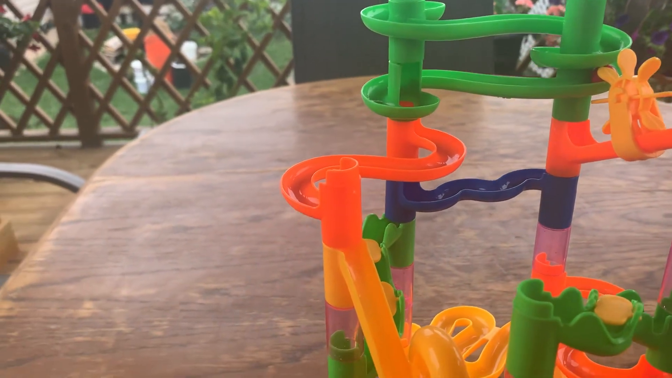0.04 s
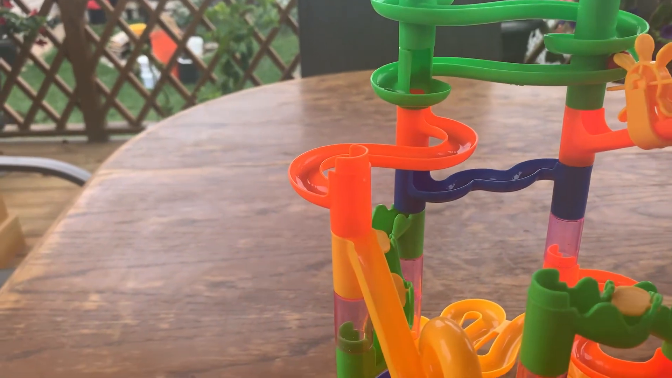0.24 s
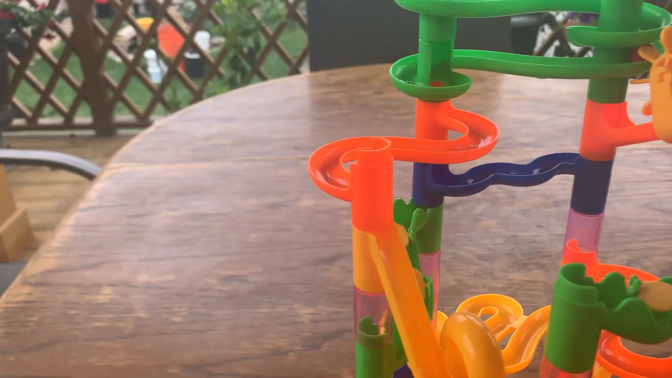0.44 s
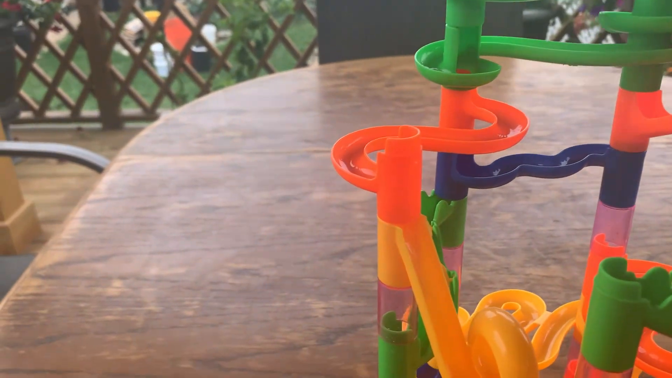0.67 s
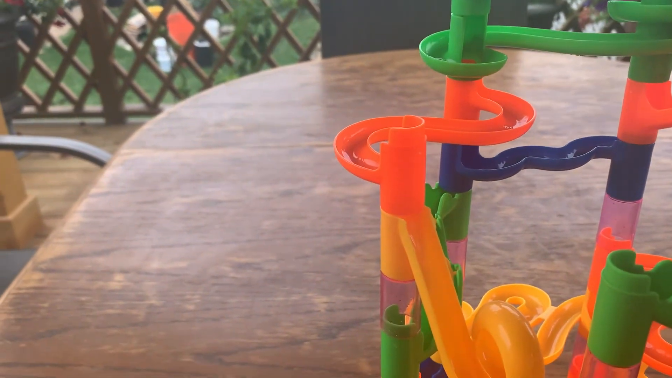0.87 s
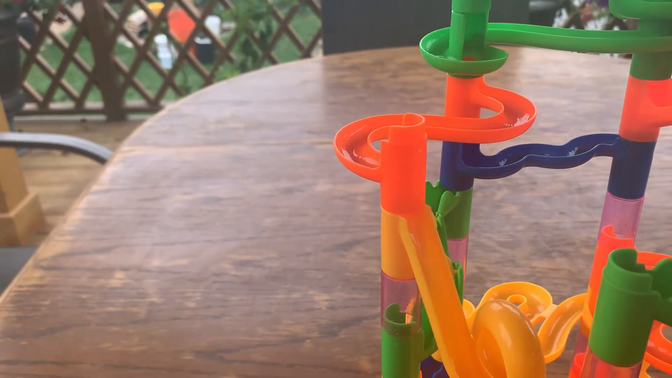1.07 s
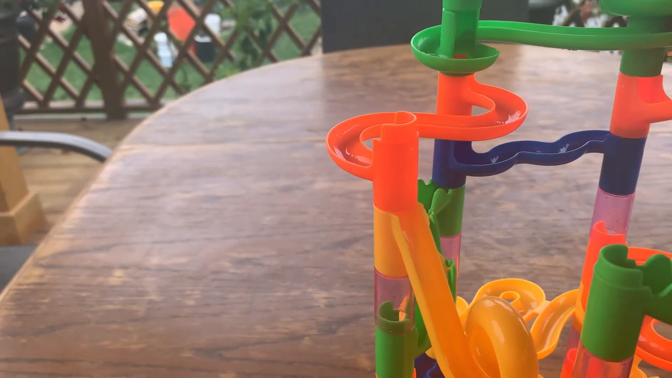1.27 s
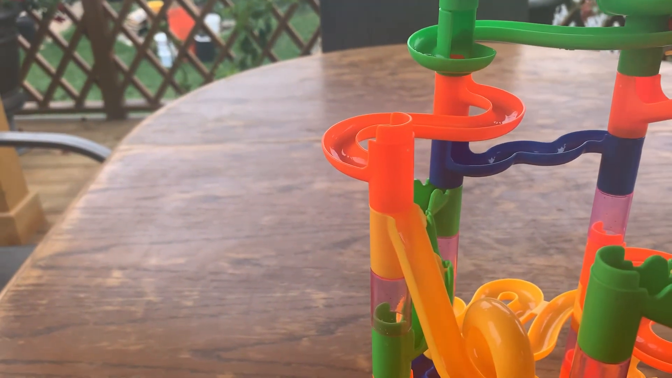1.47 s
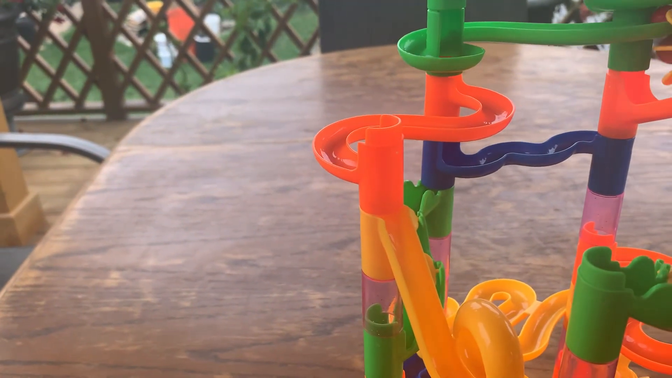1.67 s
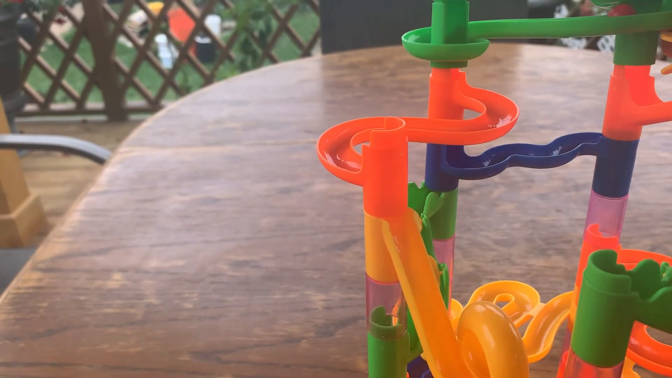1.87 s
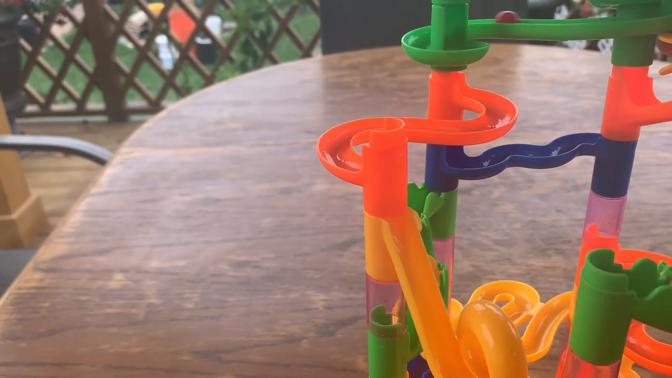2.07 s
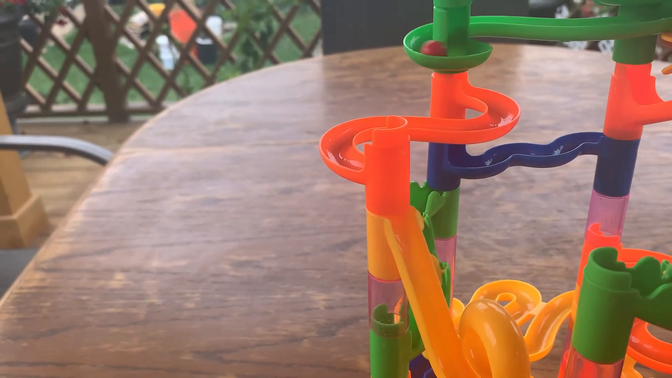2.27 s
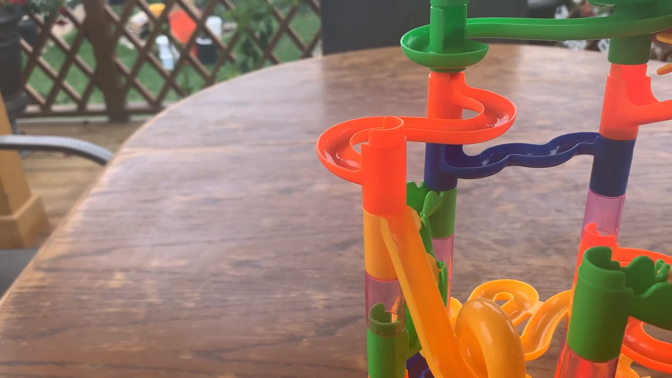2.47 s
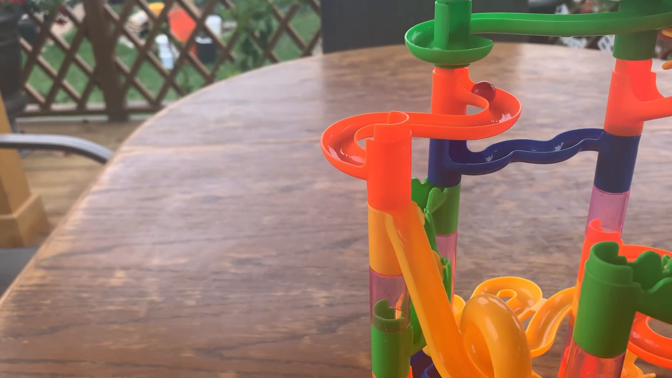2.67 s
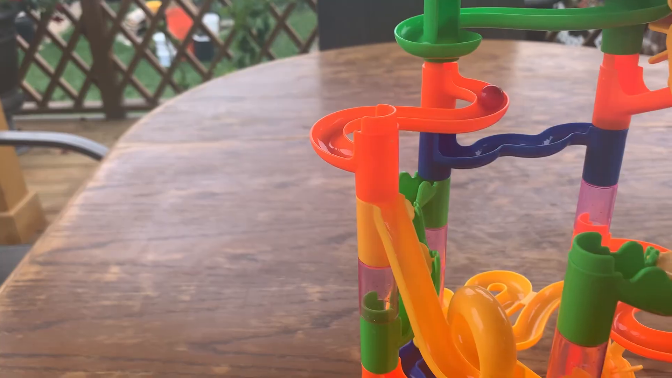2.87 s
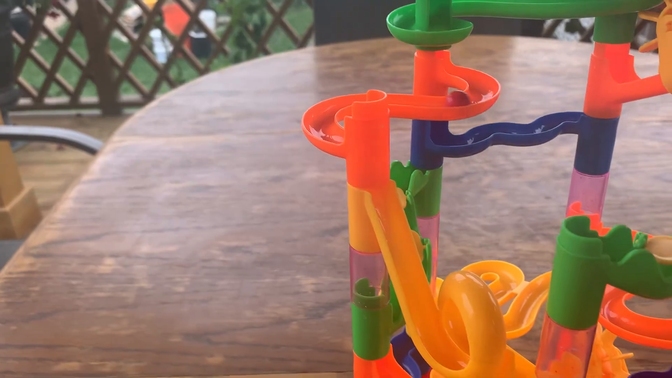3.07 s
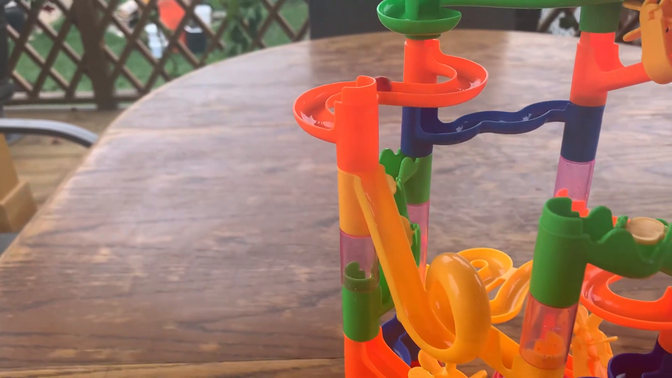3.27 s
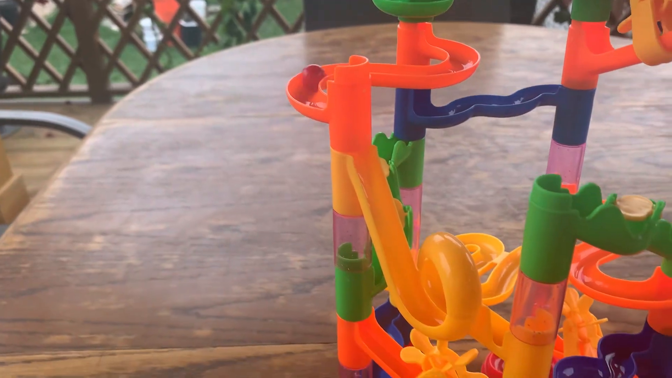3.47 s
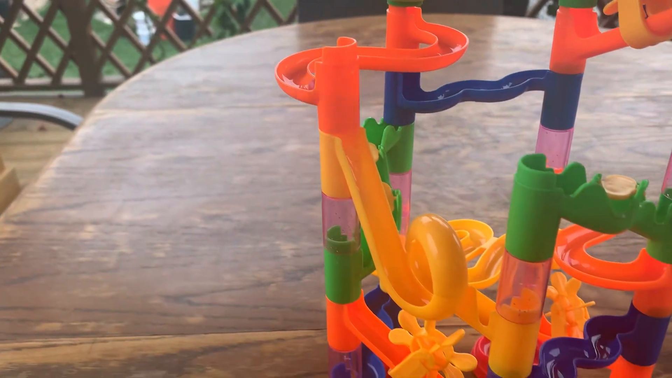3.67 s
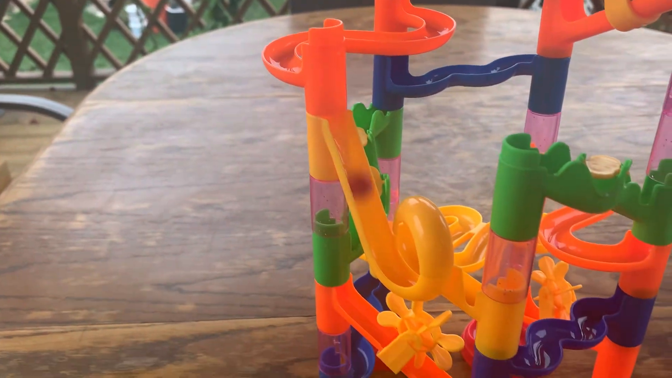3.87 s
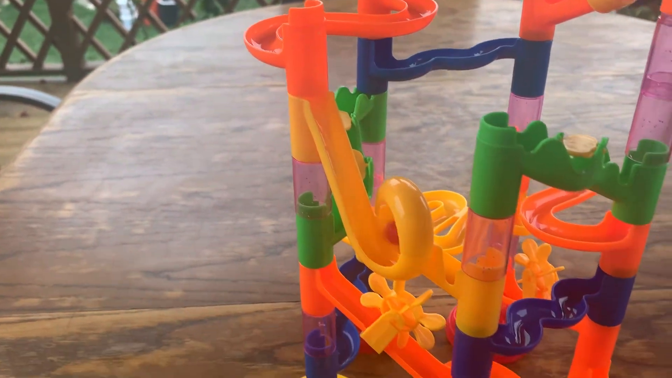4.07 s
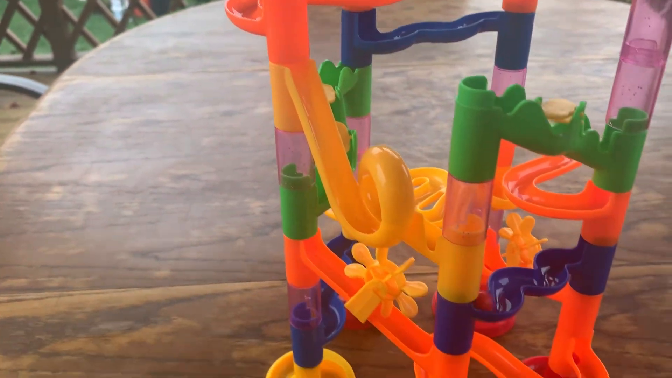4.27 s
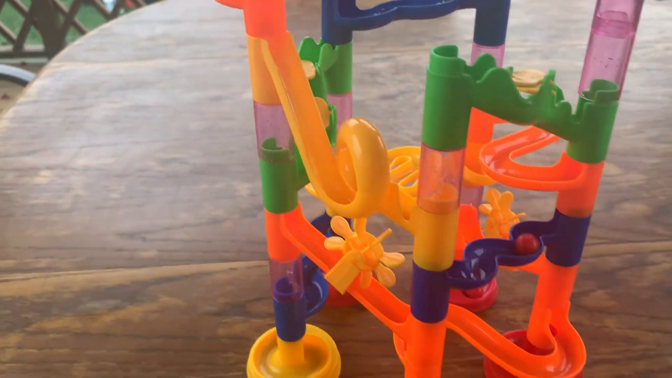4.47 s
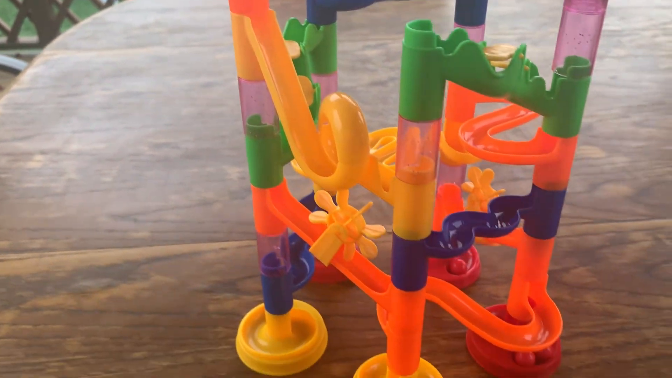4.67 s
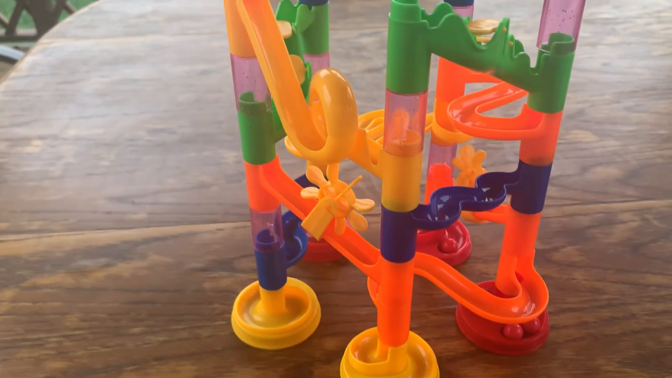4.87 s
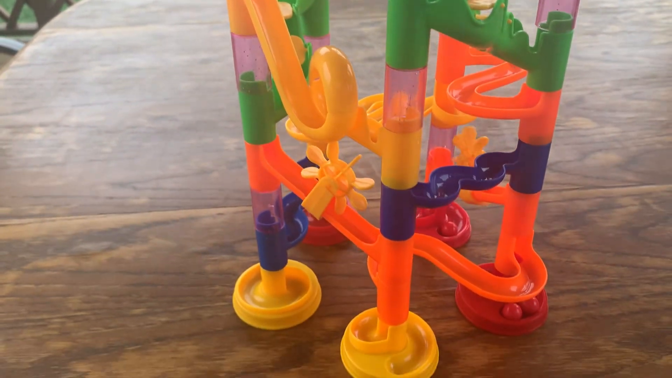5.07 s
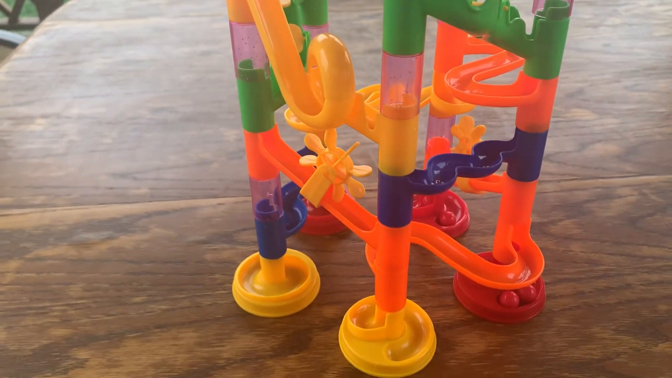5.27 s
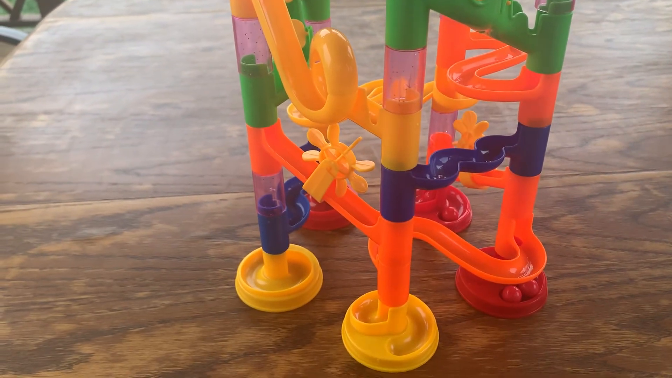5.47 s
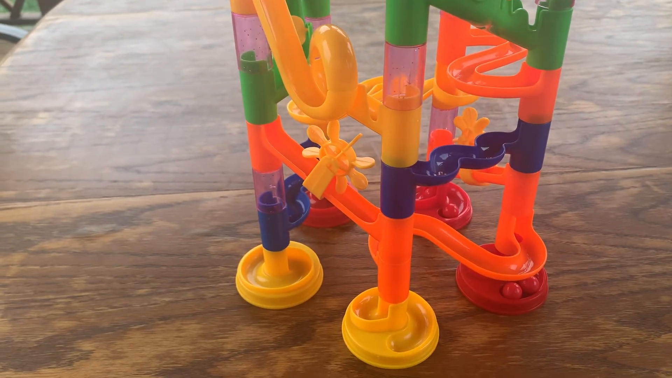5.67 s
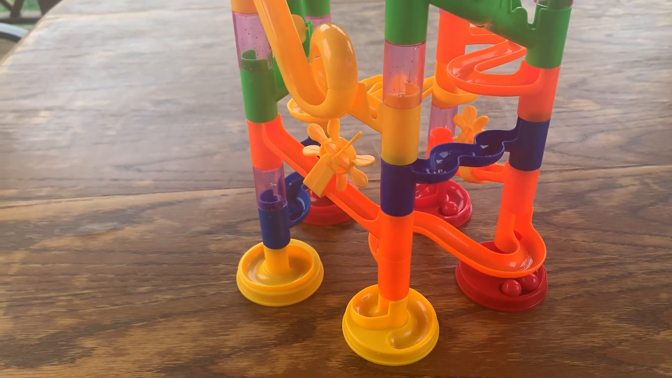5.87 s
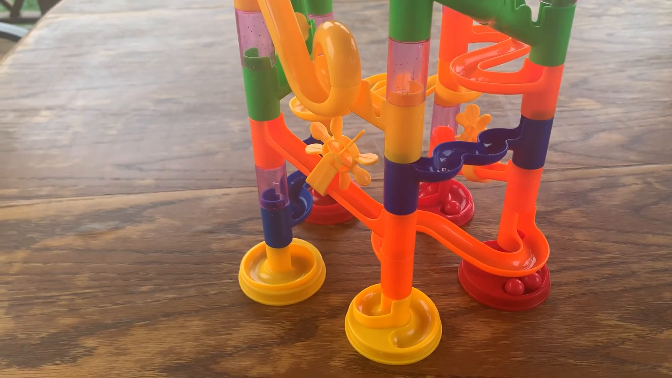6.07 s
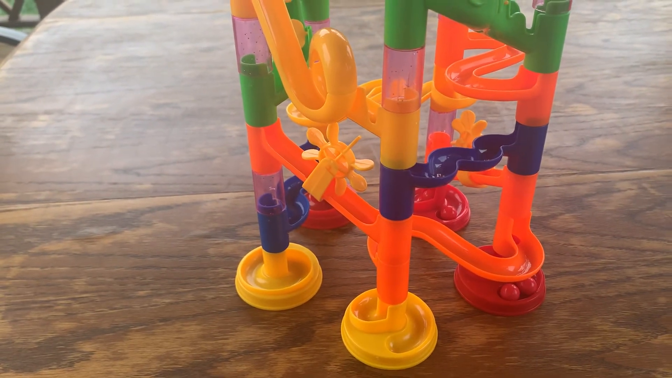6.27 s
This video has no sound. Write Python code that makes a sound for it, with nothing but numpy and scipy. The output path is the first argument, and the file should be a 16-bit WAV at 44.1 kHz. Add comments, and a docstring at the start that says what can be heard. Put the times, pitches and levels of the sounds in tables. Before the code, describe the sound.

Close stereo sound of a marble run on a sheltered deck. The marble ticks lightly in a tube, rolls dully and gets grittier, then drops with a few sharp plastic cracks. It purrs quietly round a bend with a tiny squeaky whirr, then rattles fast and loud through several pieces, thudding lightly in the wooden table. Last knocks in the cup end abruptly, leaving soft outdoor rumble and hiss.

```python
"""On a sheltered outdoor deck, a glass marble runs down a plastic marble tower on a wooden table.
It knocks about in the top tube, rolls along open tracks, drops from piece to piece and lands in the base cup.
Knocks and rolling are shaped noise and tiny ticks, sent through the resonances of each plastic piece.
Knocks also thud in the table, the more so the harder they are, and nearby surfaces answer with a short echo.
Distant rumble and a faint, slowly fading hiss lie beneath."""
import sys
import numpy as np
from scipy import signal
from scipy.fft import rfft, irfft, next_fast_len
from scipy.io import wavfile
from scipy.ndimage import map_coordinates

SR = 44100
rng = np.random.default_rng(int(sys.argv[2]) if len(sys.argv) > 2 else 0)


def dump(signal):
    """Clip the signal to [-1, 1] and save it as 16-bit WAV at the path in sys.argv[1]."""
    limited = np.clip(np.atleast_2d(signal).T, -1, 1)
    pcm = np.round(limited * 32767).astype(np.int16)
    wavfile.write(sys.argv[1], SR, pcm)


N = 279141

# The marble's knocks against the plastic. Each row: start in seconds, level in dB before the gains of
# knock() and thuds(), hollow low part in dB relative to that level.
CLICKS = [(0.6235, -36, -7.5), (0.6362, -37, -2.5), (0.745, -39.5, -1.5), (0.7732, -44.5, 4.5),
          (0.89, -46.5, 2), (0.9819, -52, 9.5), (1.2009, -48, 9), (1.2393, -63, 15), (1.2978, -68.5, 19.5),
          (1.779, -66, -5), (1.814, -67.5, 16.5), (1.9287, -53.5, -0.5), (1.9971, -57.5, 5.5),
          (2.067, -53.5, 1.5), (2.1168, -52, 1), (2.166, -50.5, 4), (2.2235, -49, 3.5), (2.248, -45, -9.5),
          (2.277, -37.5, -1), (2.3078, -36, -4), (2.34, -48.5, 8), (2.4545, -31, -3.5), (2.4905, -18, -9),
          (2.5313, -25.5, -8), (2.843, -71.5, 20.5), (3.063, -66.5, 7.5), (3.105, -64.5, 6),
          (3.2098, -59.5, -5), (3.445, -48.5, 6), (3.5571, -54.5, 4), (3.5956, -49.5, 4), (3.6782, -49, 5),
          (3.7198, -35, -11.5), (3.7248, -26, -4.5), (3.742, -20.5, -3.5), (3.7967, -30.5, -4),
          (3.881, -43.5, 10), (3.9084, -31, -6.5), (3.9204, -31.5, -0.5), (3.945, -30, 0.5),
          (3.9734, -38.5, -13.5), (4.0689, -18.5, -13.5), (4.0788, -26, -16), (4.0818, -18.5, -1.5),
          (4.1595, -30, -22), (4.1932, -20.5, -7), (4.2114, -25.5, -1.5), (4.228, -25.5, -17.5),
          (4.248, -24.5, -8), (4.2645, -22, -5), (4.3726, -51.5, 9), (4.455, -45.5, -6),
          (4.4862, -41.5, -8), (4.5052, -29.5, -5.5), (4.5475, -45, 2), (4.6262, -20, -12),
          (4.644, -25.5, -4), (4.6566, -29, -12), (4.667, -15.5, -9), (4.6999, -24, -6), (4.7482, -33, 1),
          (4.7817, -28, -24), (4.7976, -31.5, -7.5), (4.8184, -38, 1.5), (4.887, -44.5, -0.5),
          (4.9483, -38, -1), (4.986, -22.5, -3), (5.0033, -33, -4.5), (5.0233, -25, -17),
          (5.032, -14, -13.5), (5.081, -28.5, -7.5), (5.1115, -32, -5), (5.299, -55, -7.5)]
# Resonances of each plastic piece. Each row: pitch in Hz, height in dB above the shell's dense ring.
TOP_TUBE = [(1270, 7.5), (1615, 6.5), (2175, 4), (3402, 5), (6643, 7)]
UPPER_TRACK = [(1830, 5.9), (2821, 4), (3327, 3.3), (4436, 9), (9475, 5.8)]
DROP_TUBE = [(2196, 5), (3198, 5), (4360, 7.7), (6611, 11), (9345, 14), (9798, 9)]
S_TRACK = [(1292, 6.4), (1658, 4.9), (2832, 11), (3058, 5.2), (4436, 5.9), (8538, 4.1)]
CHUTE = [(1378, 4.5), (1637, 5.5), (2950, 13), (4317, 9.8), (6019, 10), (7214, 9.2)]
LOOP = [(1217, 7.8), (2885, 11), (3359, 17), (6126, 6), (6632, 13), (6869, 8), (11122, 8.9)]
LOOP_EXIT = [(2918, 4.73), (3338, 10), (4070, 4.7), (5426, 9.8), (6772, 8), (8753, 8)]
WAVY_TRACK = [(1701, 11.2), (1927, 7.5), (6621, 4.5), (7063, 5.4), (7720, 7), (8807, 5.8)]
BASE_CUP = [(1421, 12), (1820, 9.6), (6288, 4.3), (6901, 11), (8398, 3), (9453, 3.5), (10142, 17)]
# The marble's way down. Each row: arrival in seconds, resonances of the piece, extra echo in dB,
# treble of a hard knock in dB, thud of a hard knock in dB before the gains of thuds().
ROUTE = [(0.5, TOP_TUBE, 3.5, -2.5, -35), (1.452, UPPER_TRACK, 2, -4, -55), (2.43, DROP_TUBE, 0.5, -6, -44),
         (2.7, S_TRACK, .5, -8, -53), (3.705, CHUTE, 2.5, -3, -44), (4.045, LOOP, -.5, -6, -52.5),
         (4.14, LOOP_EXIT, -2, -5, -45), (4.42, WAVY_TRACK, -3, -7.5, -43.5),
         (4.97, BASE_CUP, -1, -7.5, -44)]
HARD_DB = -25  # level in the click table that counts as a hard knock


def amp(db):
    """Turn decibels into a gain."""
    return 10 ** (np.asarray(db) / 20)


def unit(x):
    """Scale a sound to an rms level of 1."""
    return x / np.sqrt(np.mean(x ** 2) + 1e-20)


def along(points, hz):
    """Read a curve of (Hz, value) points at any frequency, on a logarithmic frequency axis."""
    f, v = np.transpose(points)
    return np.interp(np.log(hz + 1), np.log(f + 1), v)


def filtered(x, response):
    """Filter a sound by multiplying its spectrum by a function of frequency."""
    n = x.shape[-1]
    m = next_fast_len(n + min(n, SR // 4))
    return irfft(rfft(x, m) * response(np.fft.rfftfreq(m, 1 / SR)), m)[..., :n]


def fade(t, t60):
    """Die away exponentially, by 60 dB in t60 seconds."""
    return np.exp(-np.log(1000) * t / t60)


def add(track, s, sound):
    """Mix a sound into a track, starting at s seconds."""
    part = track[round(s * SR):][:len(sound)]
    part += sound[:len(part)]


def wobble(count, spacing):
    """A smooth random curve of count values, with a new random knot every spacing values."""
    knots = rng.standard_normal(int(count / spacing) + 4)
    return map_coordinates(knots, [np.arange(count) / spacing])


def place(s):
    """The row of the route that the marble has reached at s seconds."""
    return ROUTE[sum(row[0] <= s for row in ROUTE[1:])]


def marble(own_share=.55, scatter_db=-3):
    """Knocks, rolling and hops ring whichever piece the marble is in; the whirr joins them directly."""
    contacts = clicks() + rolling() + hops()
    direct, aside, echo = whirr(), np.zeros(N), np.zeros((2, N))
    edges = [round(row[0] * SR) for row in ROUTE] + [N]
    for (s, modes, echo_db, *_), a, b in zip(ROUTE, edges, edges[1:]):
        # half a second of silence lets the piece ring on
        shell = np.pad(contacts[a:b], (0, SR // 2))[:N - a]
        sound = piece(shell, modes)
        add(direct, s, sound)
        add(aside, s, amp(scatter_db) * scattered(sound))
        # the whole tower radiates towards the walls, so one piece colours the echo less
        radiated = (shell + own_share * (sound - shell)) * amp(echo_db)
        for track, answer in zip(echo, deck(radiated)):
            add(track, s, answer)
    return ports(direct + echo[0], aside + echo[1])


def clicks(rebound_s=.013, rebound_db=-15):
    """The marble drops and knocks against the walls; after a short flight it touches once more, softer."""
    out = np.zeros(N)
    for (s, db, body_db), luck in zip(CLICKS, rng.random(len(CLICKS))):
        add(out, s, knock(s, db, body_db))
        flight = rebound_s * (.5 + luck)  # rebound_s is the mean
        add(out, s + flight, knock(s, db + rebound_db, body_db))
    return out


def knock(s, db, body_db, level_db=7, ring_t60=0.043, crack_t60=0.018, crack_db=3.5, crack_hz=5000,
          attack=0.0009, spot_db=3.0, treble_per_db=0.2449):
    """One contact sets the dense modes of a thin plastic shell ringing; the highest die first."""
    # The shell's dense ring. Each row: frequency in Hz, level in dB per Hz.
    shell_ring = [(60, -38.5), (250, -11), (520, -14), (800, -6.5), (1200, 2.5), (1900, 5), (3000, 2),
                  (7000, -0.5), (10000, 4), (12000, 3.5), (13500, -4), (15500, -2)]
    t = np.arange(SR // 16) / SR
    # the harder the knock, the shorter the contact and the brighter its sound
    *_, hard_treble_db, _ = place(s)
    treble_db = hard_treble_db + treble_per_db * (db - HARD_DB)
    contact = [(2000, body_db), (3000, 0), (7000, 0), (9500, treble_db)]  # Hz, dB
    # every spot on the shell favours other modes
    spot = lambda hz: spot_db * wobble(len(hz), 20)
    colour = lambda hz: amp(along(shell_ring, hz) + along(contact, hz) + spot(hz))
    modes = filtered(rng.standard_normal(len(t)), colour)
    low = filtered(modes, lambda hz: 1 / (1 + (hz / crack_hz) ** 4))
    crack = amp(crack_db) * (modes - low) * fade(t, crack_t60)
    ring = low * fade(t, ring_t60) + crack
    return amp(db + level_db) * ring * (1 - np.exp(-t / attack))


def rolling(rattle_db=-2, grit_db=-8, lumps_db=3.0, firm_db=-57, dulling=0.78, soft_hz=2300,
            grit_from_db=-56.5, grit_full_db=-50.5, slow_grit_db=-11):
    """The marble rattles unevenly over the track: dull when slow, bright and gritty as it gathers speed."""
    # The rattle and the grit on top of it. Each row: frequency in Hz, level in dB per Hz.
    rattle_colour = [(100, -43.5), (450, -18.5), (900, -5.5), (1600, -4.5), (2600, 0.5), (4500, -6.5),
                     (8000, -38), (16000, -38.5)]
    grit_colour = [(500, -51.5), (2500, -17.5), (4500, -4.5), (7000, -1.5), (10000, 2.5), (15500, -12)]
    level = roll_level()
    # grit sets in between two rolling levels
    grit_level = level + np.interp(level, [grit_from_db, grit_full_db], [slow_grit_db, 0])
    hard = chatter(rattle_colour, rate=560, spread_db=10.0, t60=0.03, bed_db=-1.5)
    soft = filtered(hard, lambda hz: 1 / (1 + (hz / soft_hz) ** 10))
    # below firm_db the rattle loses its treble
    firmness = amp(dulling * np.minimum(level - firm_db, 0))
    body = amp(level + rattle_db) * (soft + firmness * (hard - soft))
    grit = chatter(grit_colour, rate=490, spread_db=5.5, t60=0.0077, bed_db=-5.5)
    bright = amp(grit_level + grit_db) * grit
    return (body + bright) * amp(lumps_db * wobble(N, SR / 70))


def roll_level(attack_db_per_s=895.5, release_db_per_s=187.5):
    """Level in dB: most stretches grow louder as the marble gathers speed, then the rattle dies away."""
    # Stretches of free rolling. Each row: start in seconds, length in seconds, level at the end in dB
    # before the gains of rolling(), dB gained on the way.
    stretches = [(1.197, 0.028, -54, 7), (1.34, 0.46, -72, 4), (1.813, .49, -51, 19.5),
                 (2.557, .56, -73, 2.5), (3.173, 0.036, -57.5, -2), (3.304, 0.092, -59.5, 1),
                 (3.407, 0.28, -54.5, 16), (3.877, 0.045, -38.5, 21), (4.144, .08, -35.5, 10),
                 (4.342, .21, -50.5, 8.5), (4.628, 0.038, -45, 2.5), (4.757, 0.111, -50, -0.5),
                 (4.923, .18, -48.5, 5), (5.2, 0.054, -70.5, 1)]
    t, level = np.arange(N) / SR, np.full(N, -120.)
    for s, length, db, gain_db in stretches:
        run = np.interp(t, [s, s + length], [db - gain_db, db])
        before = attack_db_per_s * np.maximum(s - t, 0)
        after = release_db_per_s * np.maximum(t - s - length, 0)
        level = np.maximum(level, run - before - after)
    return level


def chatter(spectrum, rate, spread_db, t60, bed_db):
    """Tiny random contacts (rate per second), each ringing one mode, over an even rush; rms 1."""
    chance, t = rng.random((int(rate * N / SR), 3)), np.arange(SR // 50) / SR
    start = chance[:, :1] * N
    hz = 500 * 32 ** chance[:, 1:2]  # 500 to 16000 Hz
    size = amp(spread_db * chance[:, 2:])
    grains = size * fade(t, t60) * np.sin(2 * np.pi * hz * t)
    # sum all grains at their places
    spots = start.astype(int) + np.arange(len(t))
    ticks = np.bincount(spots.ravel(), grains.ravel(), N)[:N]
    both = np.array([ticks, rng.standard_normal(N)])
    ticks, bed = filtered(both, lambda f: amp(along(spectrum, f)))
    return unit(unit(ticks) + amp(bed_db) * unit(bed))


def hops(loudest_db=-71, per_s=19, hop_db=-4.5, scatter_db=4, body_db=18):
    """The marble hops over seams: soft hollow ticks at uneven times, their level under a low ceiling."""
    # the ticks follow the rolling level only up to loudest_db
    out, capped_db = np.zeros(N), np.minimum(roll_level(), loudest_db)
    chance = rng.random((int(per_s * N / SR), 2))
    for k, (late, force) in enumerate(chance):
        s = (k + late) / per_s
        db = capped_db[int(s * SR)] + hop_db + scatter_db * (2 * force - 1)
        add(out, s, knock(s, db, body_db))
    return out


def whirr(level_db=-1, edge=0.0087, flutter_db=3, waver=0.68):
    """Pressed against the rim of a bend, the marble keeps a few modes singing unsteadily."""
    # The singing modes. Each row: start in seconds, length in seconds, pitch in Hz, level in dB before level_db.
    singing = [(3.054, 0.079, 2858, -64), (3.165, .078, 2870, -49.5), (3.315, 0.125, 1668, -55.5),
               (3.299, 0.11, 4450, -65), (3.295, 0.12, 6660, -79), (3.3, 0.12, 8370, -75)]
    out = np.zeros(N)
    for s, length, hz, db in singing:
        t = np.arange(round(length * SR)) / SR
        tone = np.sin(2 * np.pi * hz * t + waver * wobble(len(t), SR / 150))
        press = np.clip(np.minimum(t, t[-1] - t) / edge, 0, 1)
        flutter = flutter_db * wobble(len(t), SR / 90)
        add(out, s, amp(db + level_db + flutter) * press * tone)
    return out


def piece(x, modes, width_hz=55, damping=0.0098):
    """The resonances of one piece stand out of the shell's ring; higher ones are wider."""
    def response(f):
        h = 1
        for hz, db in modes:
            w = width_hz + damping * hz
            h = h + (amp(db) - 1) * 1j * f * w / (hz * hz - f * f + 1j * f * w)
        return h
    return filtered(x, response)


def scattered(x, detail_hz=400):
    """Each mode radiates in its own direction: a gain and phase that vary at random with frequency."""
    vary = lambda hz: wobble(len(hz), detail_hz / hz[1])  # hz[1] is the step between frequencies
    return filtered(x, lambda hz: (vary(hz) + 1j * vary(hz)) / np.sqrt(2))


def deck(x, gap=0.0044):
    """Table, roof and walls answer from all sides, as decaying noise; how long it lasts changes with frequency."""
    # How long the echo lasts. Each row: frequency in Hz, time to fall by 60 dB in seconds.
    echo_t60 = [(200, 0.23), (700, 0.15), (1500, 0.22), (3000, 0.17), (6000, 0.14), (11000, 0.11),
                (16000, .14)]
    # Strength of the echo. Each row: frequency in Hz, level in dB relative to the sound sent in.
    echo_strength = [(200, -1.5), (1200, -2.5), (3000, -9.5), (7000, -7.5), (14000, -15.5)]
    hz, t, z = signal.stft(rng.standard_normal((2, SR // 2)), SR, nperseg=256)
    t60 = along(echo_t60, hz)[:, None]
    # each band of the tail starts with the strength that gives it unit energy
    start = np.sqrt(2 * np.log(1000) / (t60 * SR))
    z = z * fade(t, t60) * start * amp(along(echo_strength, hz))[:, None]
    tail = signal.istft(z, SR, nperseg=256)[1]
    delayed = np.pad(tail, ((0, 0), (round(gap * SR), 0)))
    return signal.fftconvolve(x[None], delayed, axes=1)[:, :len(x)]


def ports(mid, side):
    """Left and right differ in phase and level in a way that changes with frequency."""
    # Phase. Each row: frequency in Hz, radians by which left leads.
    left_lead = [(500, 1.54), (2200, 0.35), (2900, 3.5), (4300, 0.64), (5200, 3.82), (6200, 0.57),
                 (7400, -1.2), (8500, -3), (11000, -6), (13400, -10), (15400, -10.5)]
    # Balance. Each row: frequency in Hz, left minus right in dB.
    left_lean = [(300, -2.5), (1500, 0.5), (3000, 0), (4400, -3), (5400, -4), (7500, 0), (15000, 0)]
    # Width. Each row: frequency in Hz, gain in dB of the part that is opposite in the two.
    side_gain = [(300, -9.5), (1500, -13), (2600, -0.5), (5400, 0.5), (6800, -4.5), (8500, -14.5),
                 (15000, -4.5)]
    signs = np.array([[1], [-1]])
    pair = mid + signs * filtered(side, lambda hz: amp(along(side_gain, hz)))
    level = lambda hz: amp(signs * along(left_lean, hz) / 2)
    phase = lambda hz: np.exp(.5j * signs * along(left_lead, hz))
    return filtered(pair, lambda hz: level(hz) * phase(hz))


def thuds(level_db=-9, thump_db=-10, thump_t60=0.31, attack=0.0062, thud_per_db=0.68):
    """Knocks thump down the columns and ring the table top, the harder the louder."""
    # Tower and table top. Each row: pitch in Hz, level in dB before level_db, time to fall by 60 dB in seconds.
    # Each thud shifts the pitches and levels a little at random.
    table_modes = [(125.7, 0.5, .4), (148.4, -6.5, 0.34), (186, 2, 0.16), (201, -5.5, 0.23),
                   (280.9, -7.5, 0.14)]
    # A blow through the columns. Each row: frequency in Hz, level in dB per Hz before scaling to rms 1.
    thump_colour = [(60, -20), (150, 5.5), (230, -5), (420, -7), (600, -18.5), (1500, -40)]
    out, t = np.zeros(N), np.arange(SR // 3) / SR
    for s, db, _ in CLICKS:
        *_, hard_thud_db = place(s)
        chance = rng.standard_normal((len(table_modes), 2))
        ring = np.zeros(len(t))
        for (hz, level, t60), (a, b) in zip(table_modes, chance):
            tone = np.sin(2 * np.pi * hz * (1 + 0.016 * b) * t)
            ring += amp(level + 2 * a) * fade(t, t60) * tone
        noise = filtered(rng.standard_normal(len(t)), lambda hz: amp(along(thump_colour, hz)))
        thump = unit(noise) * fade(t, thump_t60)
        blow = amp(level_db) * ring + amp(thump_db) * thump
        force = amp(hard_thud_db + thud_per_db * (db - HARD_DB))
        add(out, s, force * blow * (1 - np.exp(-t / attack)))
    return out


def outdoors(level_db=-55.0, rumble_db=1.0, swell_db=0.5, swells_per_s=3, pan_db=-0.48, hiss_hz=1800,
             hiss_db=4, hiss_fades_db_per_s=1.04):
    """Distant rumble, much alike at both microphones and gently swelling, under a slowly fading hiss."""
    # Colour of the open air. Each row: frequency in Hz, level in dB per Hz before scaling to rms 1.
    air_colour = [(20, -18), (35, -9.5), (58, 3), (85, -1.5), (130, -5), (200, -10), (350, -20),
                  (550, -25.5), (820, -18), (1250, -27), (2000, -40.5), (3200, -45), (7000, -54),
                  (15000, -51)]
    # Left-right likeness. Each row: frequency in Hz, likeness from -1 (opposite) to 1 (the same).
    likeness = [(60, .95), (130, 0.89), (290, .55), (640, -0.34), (1400, -0.27), (4000, 0.16)]
    # the likeness sets how noise is shared between mid and side
    turn = lambda hz: np.arccos(np.clip(along(likeness, hz), -1, 1)) / 2
    share = lambda hz: np.array([np.cos(turn(hz)), np.sin(turn(hz))])
    noise = rng.standard_normal((2, N))
    mid, side = filtered(noise, lambda hz: amp(along(air_colour, hz)) * share(hz))
    air = unit(np.array([mid + side, mid - side]))
    low = filtered(air, lambda hz: 1 / (1 + (hz / 250) ** 2))
    band = [hiss_hz / 2, hiss_hz, 2 * hiss_hz, 9000]
    high = filtered(air, lambda hz: np.interp(hz, band, [0, 1, 1, 0]))
    swell = amp(rumble_db + swell_db * wobble(N, SR / swells_per_s))
    hiss = amp(hiss_db - hiss_fades_db_per_s * np.arange(N) / SR)
    balance = amp(level_db + pan_db * np.array([[1], [-1]]))
    return balance * (air + (swell - 1) * low + (hiss - 1) * high)


def scene():
    """The marble, the table and the open air."""
    return marble() + thuds() + outdoors()


def record(dry, peak=.82, top_hz=16100):
    """Round off the loudest peaks and cut steeply above the band limit."""
    rounded = dry / (1 + np.abs(dry / peak) ** 6) ** (1 / 6)
    return filtered(rounded, lambda hz: 1 / (1 + (hz / top_hz) ** 120))


dry = scene()
out = record(dry)
dump(out)
```